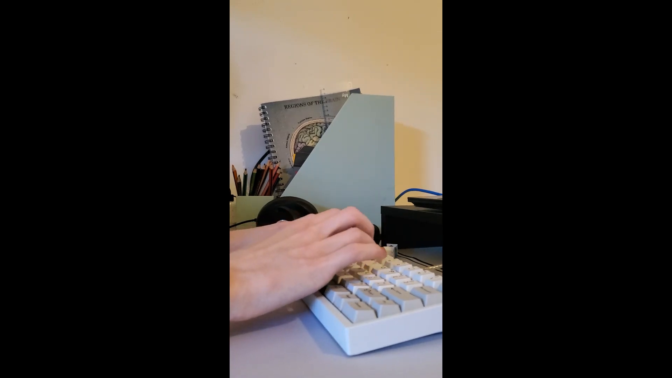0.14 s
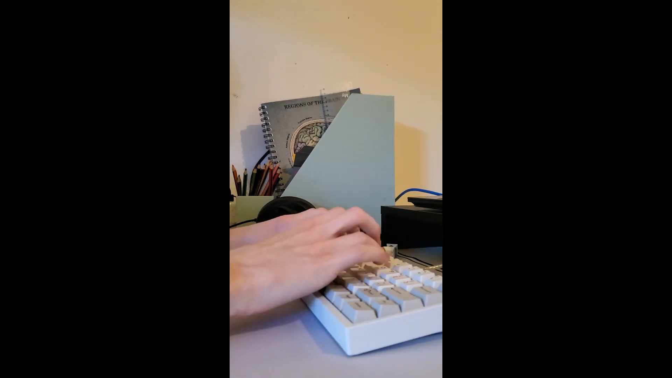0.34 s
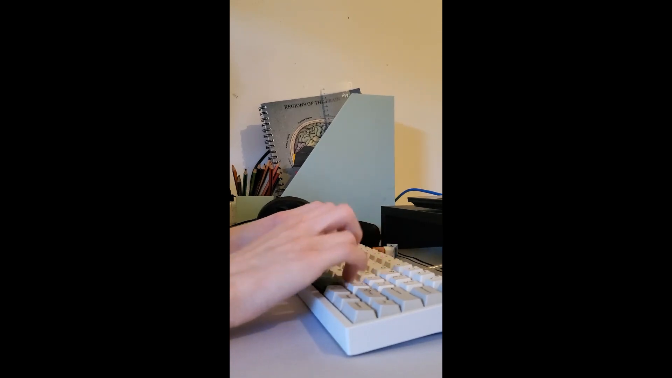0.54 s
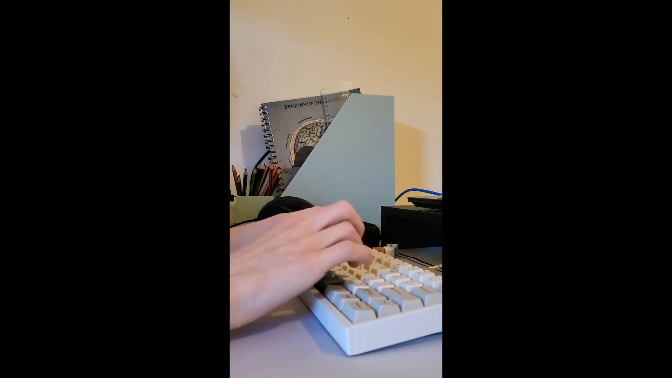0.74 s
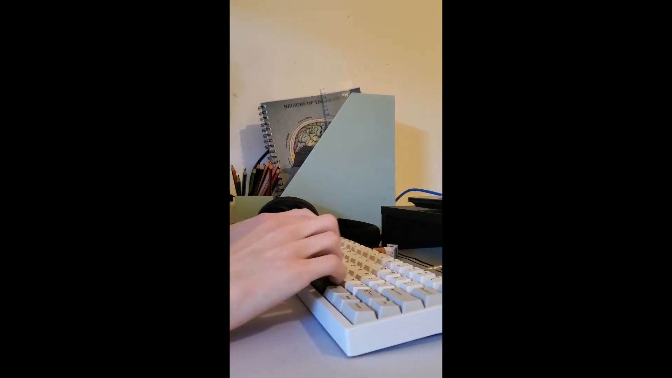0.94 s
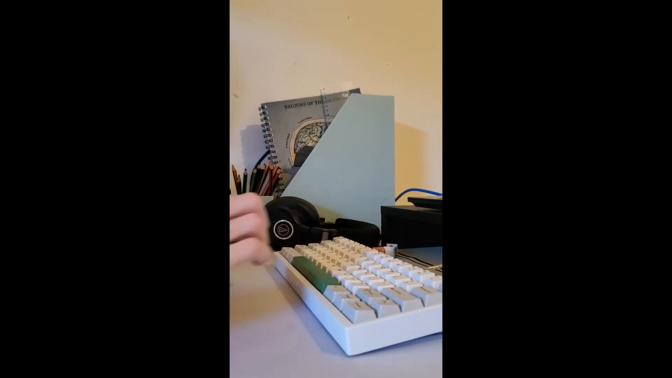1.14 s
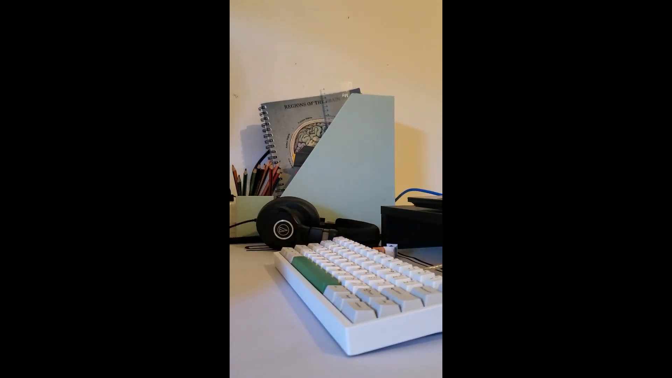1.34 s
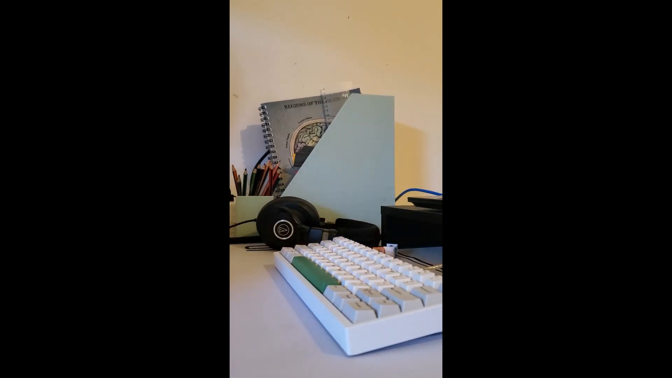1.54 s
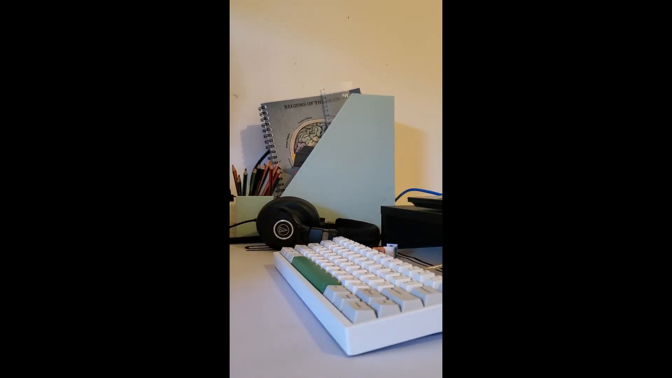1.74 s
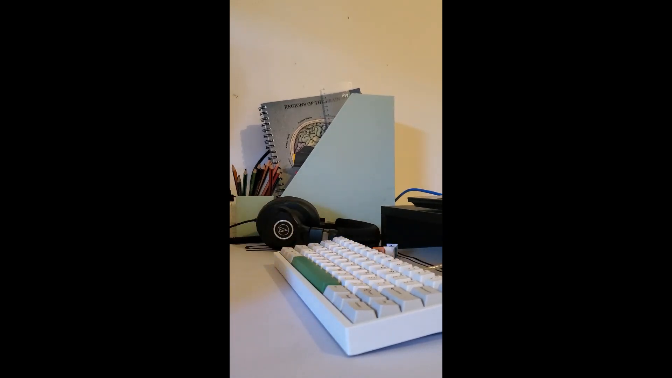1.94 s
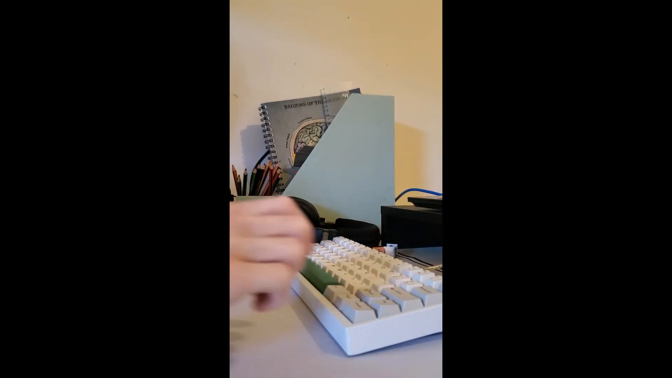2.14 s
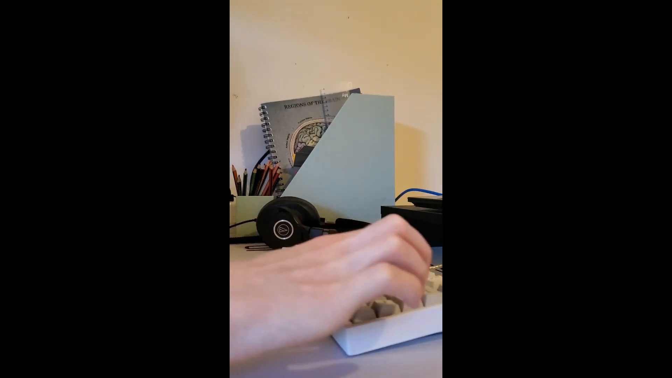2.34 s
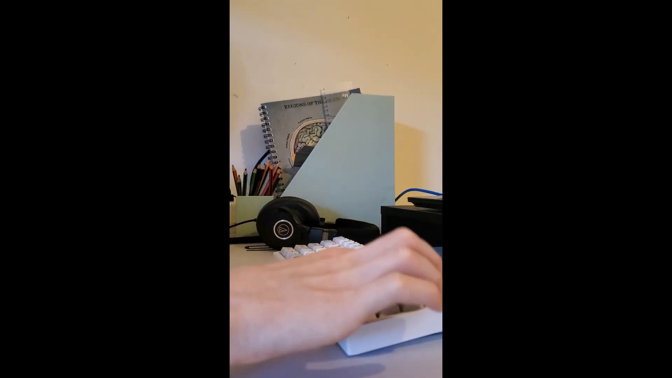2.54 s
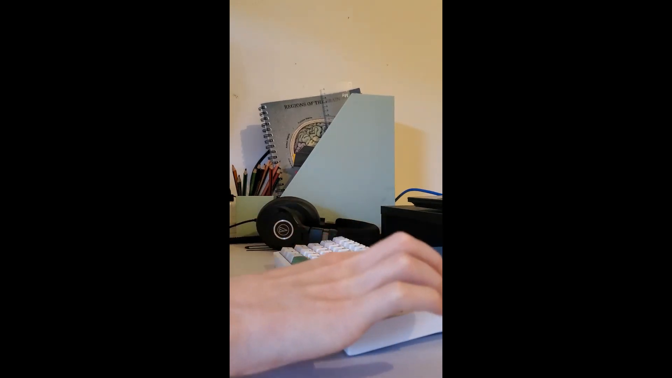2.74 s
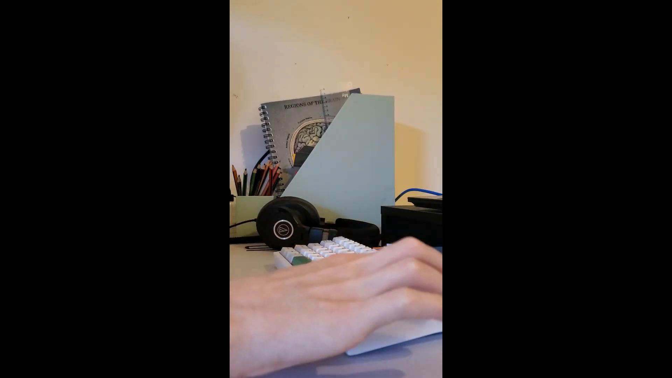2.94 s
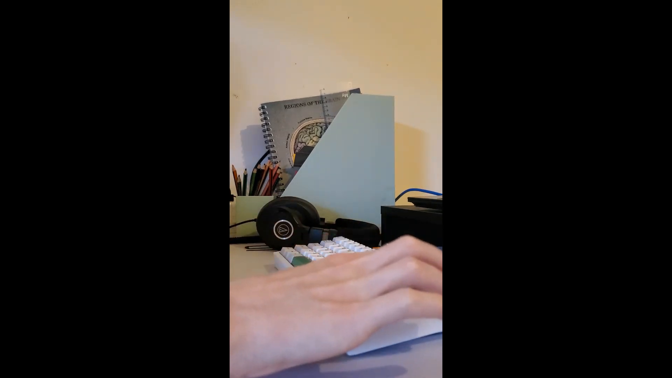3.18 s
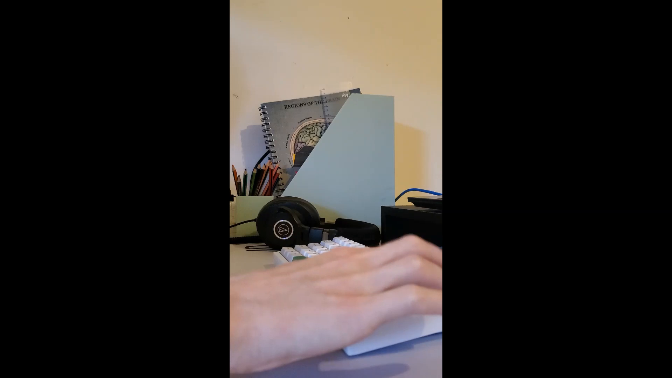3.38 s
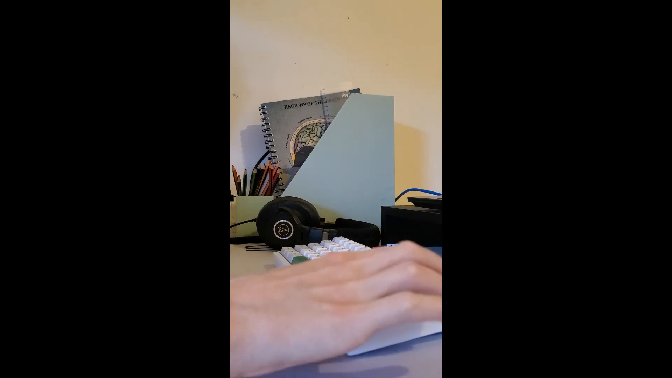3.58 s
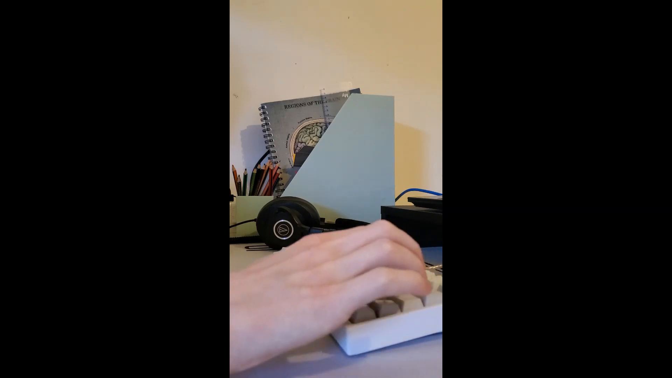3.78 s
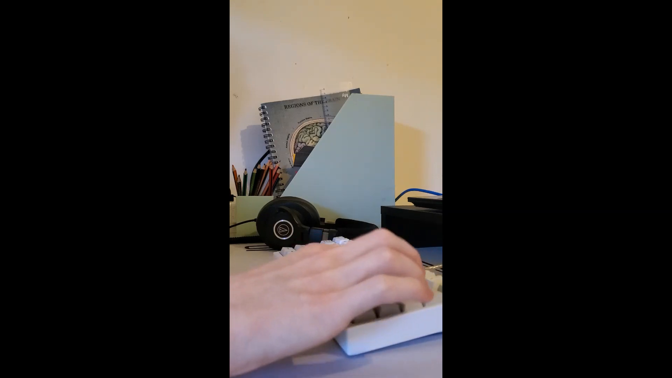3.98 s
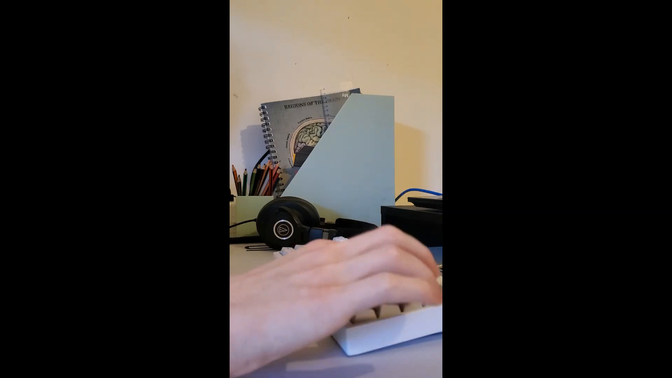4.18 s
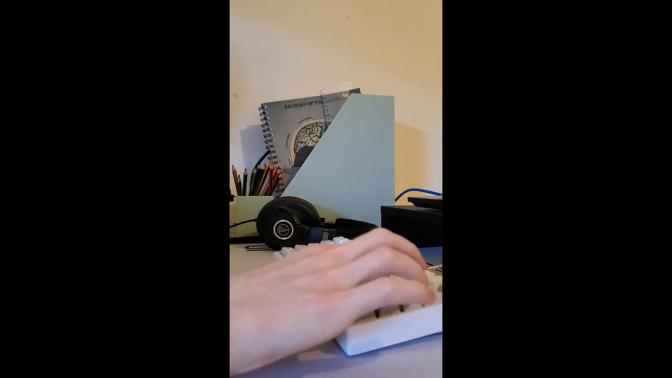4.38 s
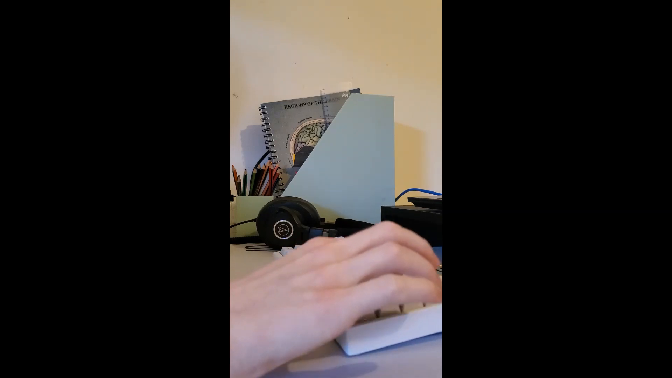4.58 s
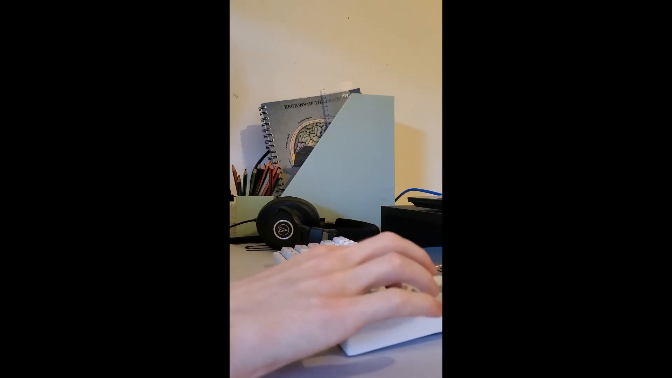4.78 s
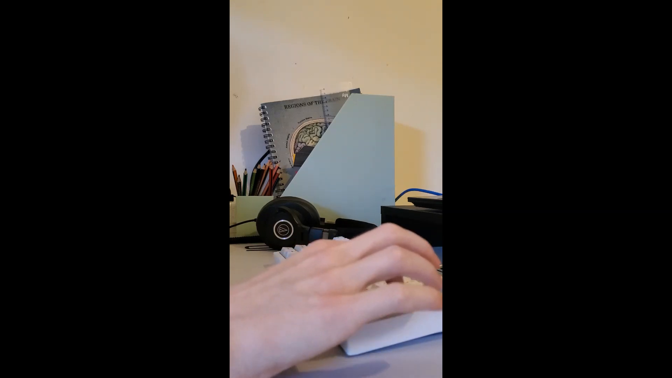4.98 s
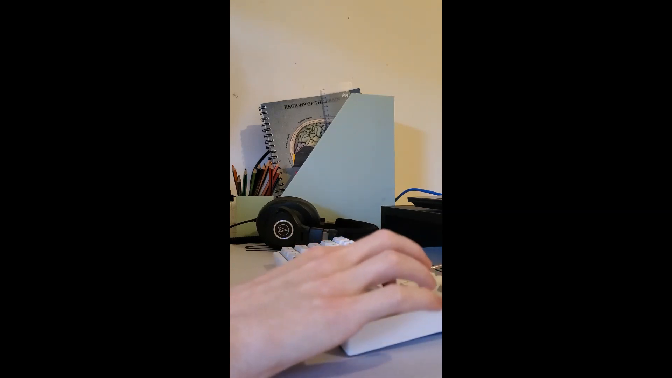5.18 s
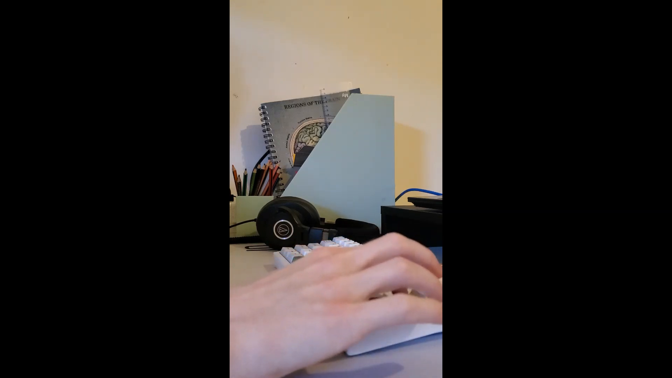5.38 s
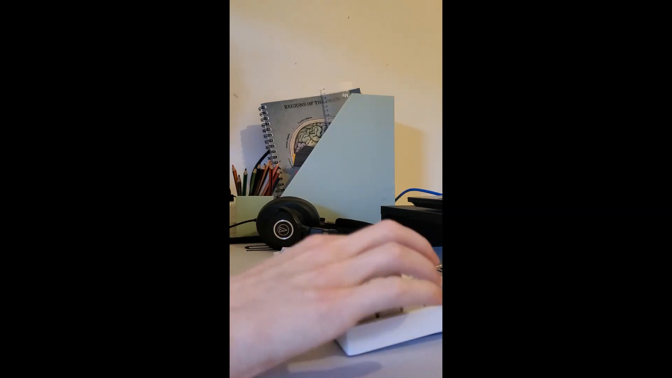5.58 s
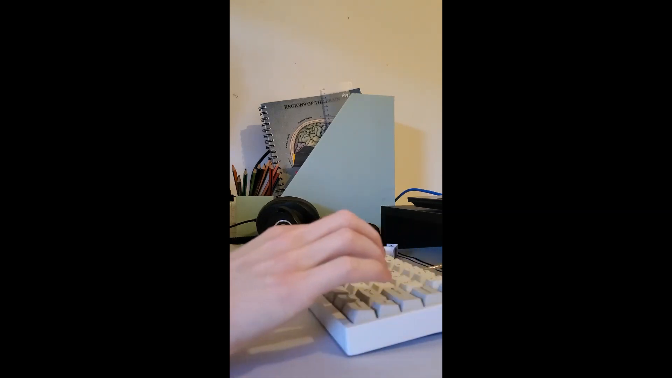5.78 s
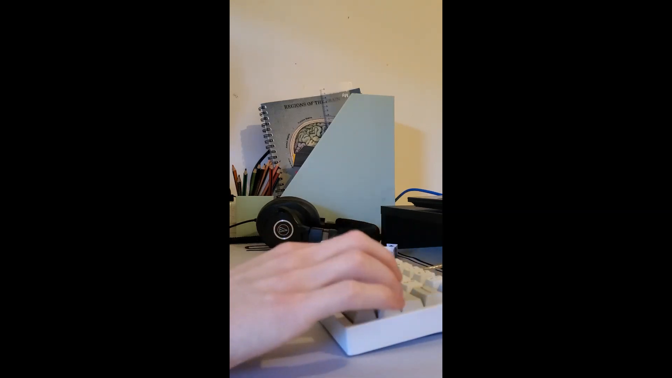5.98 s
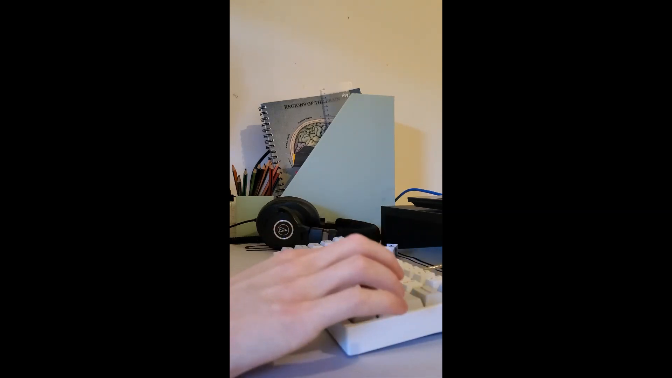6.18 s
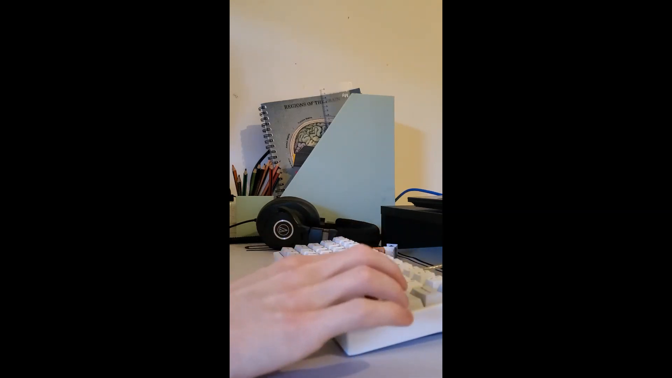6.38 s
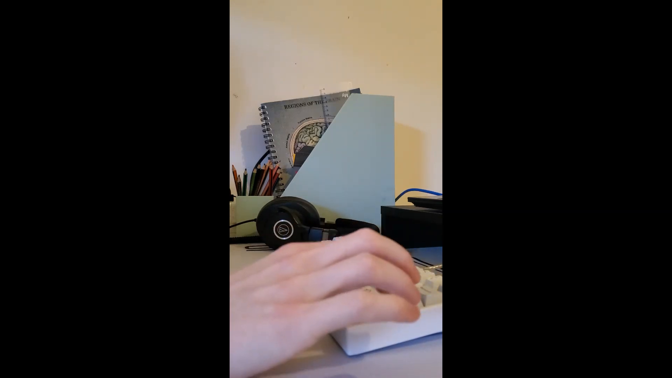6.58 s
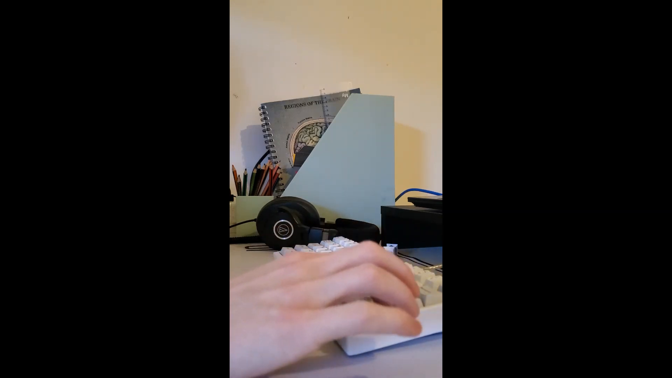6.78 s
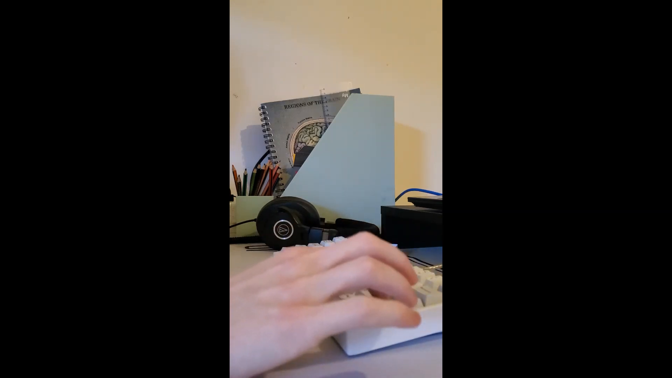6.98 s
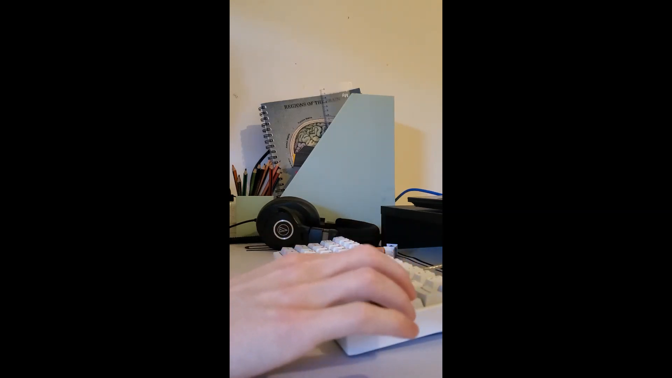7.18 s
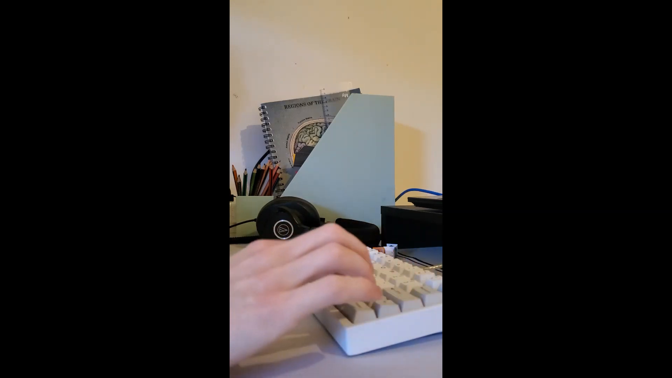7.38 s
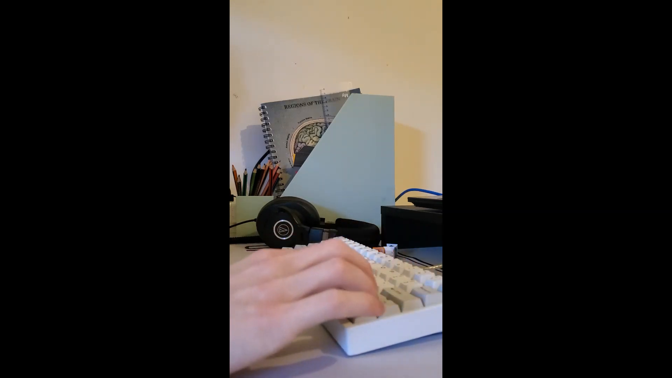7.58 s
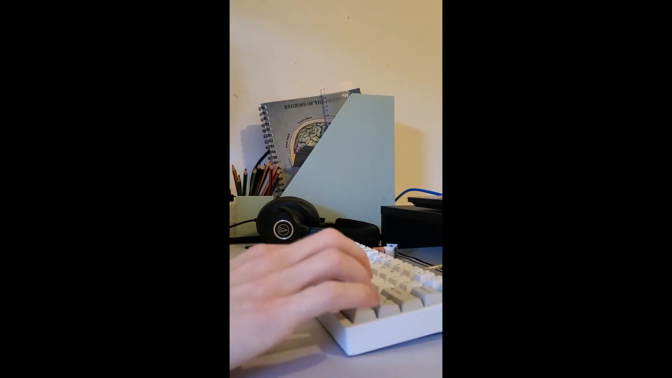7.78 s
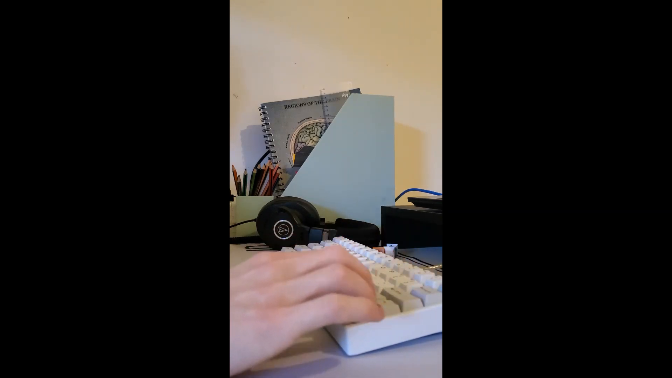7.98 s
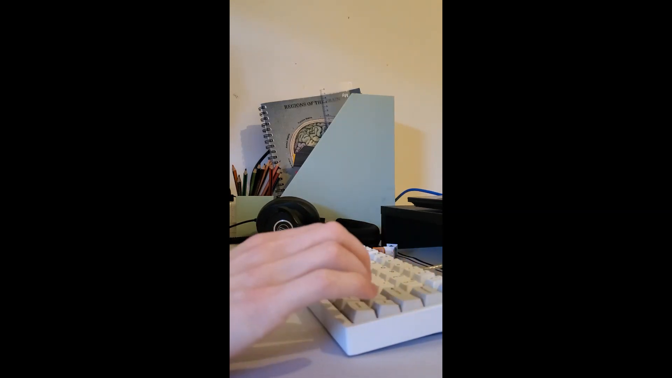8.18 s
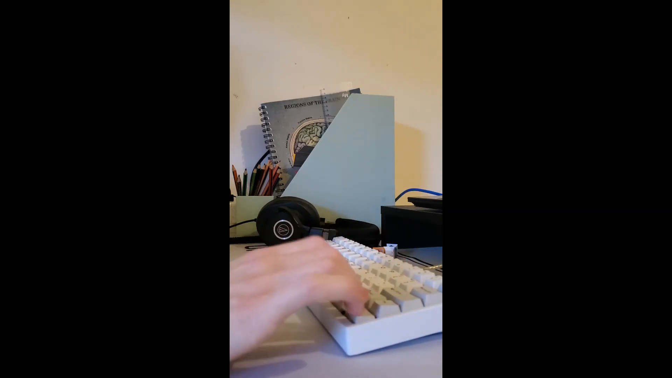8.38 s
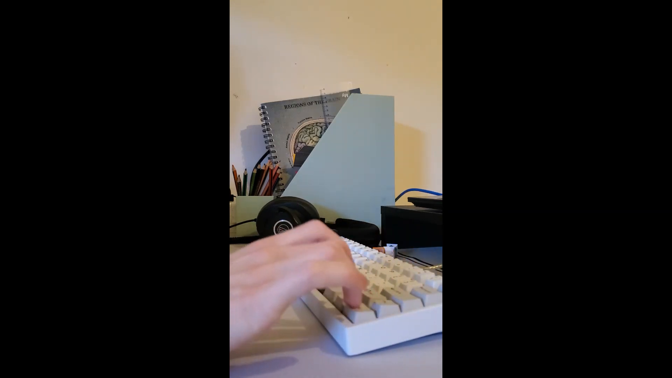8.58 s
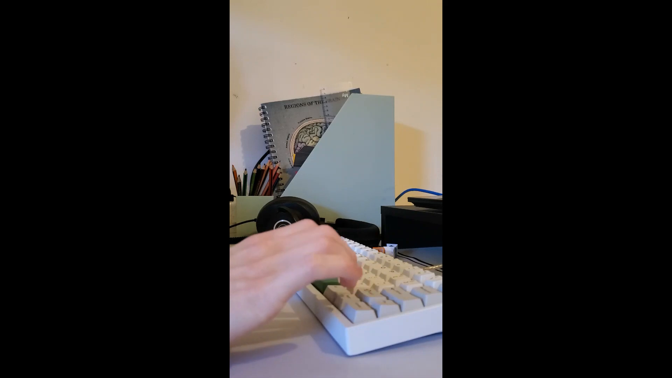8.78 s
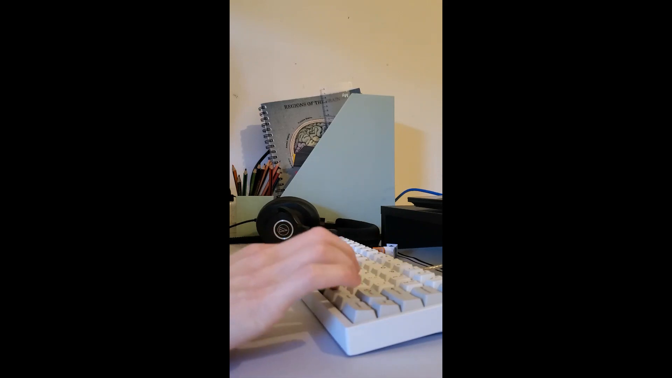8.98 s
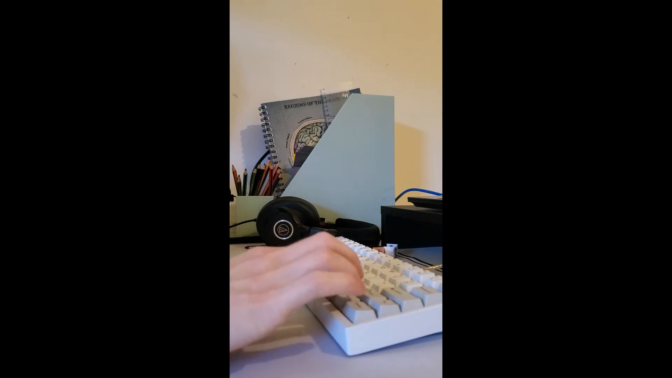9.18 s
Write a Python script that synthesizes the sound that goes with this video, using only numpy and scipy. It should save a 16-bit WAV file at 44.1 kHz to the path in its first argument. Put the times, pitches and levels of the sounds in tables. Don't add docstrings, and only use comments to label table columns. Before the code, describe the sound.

Close, dry plastic typing on a desk. Caps chatter rapidly under brushing fingers, thin out and stop; a faint scuff follows in the lull. Then regular presses at about eight a second, with short gaps, each press followed by a lighter spring-back tick. Early taps are scratchy, middle ones clickier, later ones fuller. The right channel is close, the left duller and roomier, with low hum and soft hiss beneath.

```python
import sys
import numpy as np
from scipy import signal
from scipy.fft import rfft, irfft
from scipy.io import wavfile

SR = 44100
rng = np.random.default_rng(int(sys.argv[2]) if len(sys.argv) > 2 else 0)


def boost_factor(decibels):
    exponent = np.asarray(decibels, float) / 20
    return 10 ** exponent


def inscribe(sig):
    pcm = np.round(np.clip(np.atleast_2d(sig).T, -1, 1) * 32767)
    wavfile.write(sys.argv[1], SR, pcm.astype(np.int16))


N = 407043

# (low f/Hz, high f/Hz, level/dB, 60 dB decay t/s)
CONTACT_BANDS = [(1090, 3840, -1.5, 0.02), (3740, 6640, -0.5, 0.0095), (8000, 12570, -0.5, 0.008),
                 (12000, 15500, -1.5, 0.0096)]
HIT_LAG_S = 0.001192
ROLL_END_S = 1


def band(x, low_hz, high_hz):
    high_hz = min(high_hz, 0.45 * SR)
    return signal.sosfilt(signal.butter(2, [low_hz, high_hz], "band", fs=SR, output="sos"), x + 1e-18)


def rms_one(x):
    return x / np.sqrt(np.mean(x ** 2) + 1e-30)


def fade(db, t60):
    return boost_factor(-db / (t60 * SR))


def drift(rate):
    knots = rng.standard_normal(1200)
    return np.interp(np.arange(N) / SR * rate, np.arange(len(knots)), knots) * 1.2


def train(seconds, sizes):
    out = np.zeros(N)
    np.add.at(out, np.clip(np.round(seconds * SR).astype(int), 0, N - 1), sizes)
    return out


def ring(clicks, hz, t60):
    r, w = fade(60, t60), 2 * np.pi * hz / SR
    return signal.lfilter([0, np.sin(w)], [1, -2 * r * np.cos(w), r * r], clicks + 1e-18)


def colour(x, peaks):
    for hz, width, db in peaks:
        a, w = boost_factor(db / 2), 2 * np.pi * hz / SR
        k = np.sin(w) * width / hz / 2
        middle = -2 * np.cos(w)
        x = signal.lfilter([1 + k * a, middle, 1 - k * a], [1 + k / a, middle, 1 - k / a], x)
    return x


def tail(x, low_hz, high_hz, t60):
    r = fade(120, t60)
    smooth = signal.lfilter([0.008], [1, -0.992], x ** 2)
    power = signal.lfilter([1 - r], [1, -r], smooth)
    return np.sqrt(power) * rms_one(band(rng.standard_normal((2, N)), low_hz, high_hz))


def hiss(level_db=-67):
    # (f/Hz, level/dB per Hz)
    floor = np.array([(35, -1.5), (62, -1.5), (115, -9.5), (160, -9.5), (250, -11.5), (400, -15.5),
                      (700, -26), (1500, -30), (3000, -33), (5500, -38.5), (7800, -48), (10000, -39.5),
                      (13000, -34.5), (15850, -35.5), (16050, -57)])
    hz = np.fft.rfftfreq(N, 1 / SR) + 1
    shape = boost_factor(np.interp(np.log(hz), np.log(floor[:, 0]), floor[:, 1]))
    return boost_factor(level_db) * rms_one(irfft(rfft(rng.standard_normal((2, N))) * shape, N))


def hum():
    # (f/Hz, rms level/dB, left re right level/dB)
    lines = [(49, -50, -10), (89.3, -68, -10), (138.9, -66, -16.5), (189, -79, -11), (308, -68.5, -32.5),
             (346, -78.5, -32.5)]
    t, out = np.arange(N) / SR, np.zeros((2, N))
    for hz, db, left_db in lines:
        level = np.sqrt(2) * boost_factor(db + 1.5 * drift(8))
        tone = level * np.sin(2 * np.pi * hz * t + 0.8 * drift(4))
        out += tone * boost_factor(np.array([[left_db], [0]]))
    return out


def room(x, parts=2):
    # (low f/Hz, high f/Hz, 60 dB decay t/s, right level/dB, left level/dB)
    answers = [(624, 1200, 0.33, -8.5, -11), (1173, 1700, 0.28, -6.5, -2.5), (1630, 2780, 0.22, -9.5, -5.5),
               (2210, 3280, 0.22, -6, -2.5), (3140, 4370, 0.29, -8, -4), (4240, 6010, 0.21, -7.5, -4.5),
               (7500, 10930, 0.21, -8, 0.5), (12200, 14000, 0.38, -10.5, -2.5)]
    out = 0
    for low, high, t60, right_db, left_db in answers:
        edges = np.geomspace(low, high, parts + 1 if 1000 < low < 4000 else 2)
        for a, b in zip(edges, edges[1:]):
            out = out + boost_factor(np.array([[left_db], [right_db]])) * tail(band(x, a, b), a, b, t60)
    return out


def echoes(x):
    # (lag t/s, right level/dB, left level/dB, dull above f/Hz)
    copies = [(.0032, -22.5, -12, 5000), (.0056, -11.5, -13, 3500), (.0092, -15.5, -13.5, 15000),
              (.0101, -17.5, -14, 9000), (.021, -33, -26, 8000), (.0272, -22, -20.5, 3500),
              (0.0324, -23.5, -18, 6500), (.0425, -30.5, -20, 4000)]
    out = np.zeros((2, N))
    for lag, right_db, left_db, hz in copies:
        dull = signal.sosfilt(signal.butter(2, hz, fs=SR, output="sos"), x)
        out += np.roll(dull, round(lag * SR)) * boost_factor(np.array([[left_db], [right_db]]))
    return out


def knocks():
    # (t/s, level/dB, f/Hz, 60 dB decay t/s, left re right level/dB)
    blows = [(0.131, -55, 960, 0.06, -24), (1.0401, -66, 1600, .03, -12), (1.0412, -66, 1040, .04, -12),
             (1.071, -65, 1620, .05, -12), (1.0725, -64, 2100, .04, -12), (1.074, -61, 1020, 0.05, -12),
             (1.082, -68, 1650, .05, -12), (1.097, -64, 1010, .05, -12), (1.0981, -40, 90, 0.13, -23),
             (1.116, -68, 1050, .1, -12), (1.6041, -54, 2400, 0.13, -17), (1.9591, -79, 1780, .15, -14),
             (6.0258, -45.5, 210, 0.011, 14), (6.0271, -34.5, 78.6, .045, 7)]
    out = np.zeros((2, N))
    for s, db, hz, t60, left_db in blows:
        blow = ring(train(np.array([s]), boost_factor(db)), hz, t60)
        out += band(blow, hz / 2, hz * 2) * boost_factor(np.array([[left_db], [0]]))
    return out


def rubbing(gains, grain_db):
    clumps = boost_factor(grain_db * drift(110)) * boost_factor(2.0 * rng.exponential(1, N))
    slips = rng.standard_normal(N) * clumps
    return sum(g * rms_one(band(slips, low, high)) for g, (low, high, _, _) in zip(gains, CONTACT_BANDS))


def brushing(rise_db_per_s=1600, fall_db_per_s=191):
    # (t/s, held t/s, dull level/dB, middle re dull level/dB, bright re dull level/dB)
    strokes = [
        (0, .52, -66.5, -22, -5.5),
        (0.621, .04, -92, -12, -5),
        (1.599, 0.021, -60, 5, 2),
        (1.8, 0.017, -81, 8.5, 6),
        (1.97, 0.11, -86.5, 11, 13),
        (2.19, 0.055, -88.5, 4.5, 4),
    ]
    gains, t = np.zeros((4, N)), np.arange(N) / SR
    for s, held, db, mid_db, bright_db in strokes:
        shape_db = np.minimum(0, np.minimum(rise_db_per_s * (t - s), fall_db_per_s * (s + held - t)))
        gains += boost_factor(db + shape_db) * boost_factor(np.array([[0], [mid_db], [bright_db], [bright_db]]))
    return colour(rubbing(boost_factor(1.0) * gains, grain_db=0.5), [(2400, 1300, 11.0)])


def sliding():
    # (t/s, level/dB)
    scratch = [
        (2.45, -97),
        (2.709, -62),
        (4.05, -90),
        (4.13, -64),
        (5.58, -90.5),
        (9.23, -99),
    ]
    level = boost_factor(np.interp(np.arange(N) / SR, *np.transpose(scratch), left=-200))
    return rubbing(boost_factor(np.array([[-2.5], [-3], [-6], [-7]])) * level, grain_db=4.5)


def contacts(roll_cap_db=1.5, roll_air_db=-30, touch_cap_db=-2, touch_stem_db=-13):
    # (t/s, peak level/dB, case f/Hz, stem tick re peak
    # level/dB, desk thump level/dB)
    fast_roll = [(0.0041, -40.5, 2820, -20, -53), (0.0403, -40, 3960, -11, -60),
                 (0.049, -31, 3510, -19, -55), (0.0569, -33, 3000, -23, -59), (0.07, -50, 2450, -23, -55),
                 (0.0765, -54, 2990, -23, -48.5), (0.1274, -36, 1660, -4.5, -53),
                 (0.154, -33.5, 1720, -4.5, -53), (0.1691, -36, 1840, -17, -65),
                 (0.1961, -57, 1890, -25, -67), (0.2201, -41, 2560, -17, -52),
                 (0.2352, -30, 2340, -11, -60), (0.2425, -42, 2080, -7, -51), (0.262, -47, 2320, -6, -56),
                 (0.266, -52, 2280, -20, -50), (0.2792, -52, 2500, -9, -53), (0.2865, -40, 4200, -3, -59),
                 (0.2931, -32.5, 1760, -23, -54), (0.3007, -30, 3220, -9.5, -49.5),
                 (0.3087, -37, 3170, -13, -59), (0.3191, -26.5, 2540, -21, -53),
                 (0.3271, -32, 2720, -9, -66), (0.337, -46, 2840, -21, -60),
                 (0.346, -46, 2730, -20, -61), (0.3562, -53, 2880, -20, -46.5),
                (0.3738, -46, 2520, -19, -53), (0.3815, -31.5, 1800, -19, -48),
                (0.4019, -37, 2930, -1, -57), (0.4102, -48, 3270, -14, -50), (0.4239, -28, 2570, -18, -47),
                (0.4312, -34, 2280, -16, -65), (0.4491, -48, 2470, -19, -53.5),
                (0.4705, -42, 2300, -4, -55), (0.4776, -46, 2680, -6, -48), (0.4837, -31.5, 1710, -29, -52),
                (0.492, -32.5, 3120, -16, -51), (0.502, -42, 2500, -23, -56), (0.512, -48, 2370, -25, -75),
                (0.519, -37.5, 3340, -6.5, -56), (0.5281, -42, 2240, -12, -49.5),
                (0.5406, -48, 2260, -14, -52.5), (0.5565, -46, 2220, -2, -53.5),
                (0.6347, -39.5, 3630, -4.5, -57), (0.6509, -32, 1930, -7, -51.5),
                (0.763, -44, 2000, -3.5, -57.5)]
    # (t/s, peak level/dB, case f/Hz, desk thump
    # level/dB)
    touches = [(1.0391, -59, 1750, -59), (0.98, -62, 1490, -66), (1.598, -53, 2400, -82),
               (1.608, -49, 2400, -75), (1.6175, -50, 2500, -81), (1.635, -45, 2310, -75),
               (2.624, -43.5, 1778, -80), (3.461, -53, 2000, -52), (3.9454, -41.5, 2050, -58),
               (4.287, -58, 2500, -60), (4.848, -55, 2500, -57), (5.029, -51, 2240, -53),
               (5.2172, -41.5, 2050, -57), (5.9472, -46.5, 1750, -56.5), (6.337, -47, 2010, -55),
               (6.707, -69, 1225, -54), (7.1224, -57, 1996, -61), (4.9, -61, 2000, -53),
               (7.5047, -53, 2930, -60.5), (7.7233, -53, 2500, -56), (8.0436, -51, 2098, -73),
               (8.4135, -50.5, 2000, -60), (8.977, -50, 2940, -54.5)]
    # (t/s, peak level/dB, case f/Hz, desk thump level/dB, cap click
    # re peak level/dB)
    presses = [(2.5002, -28, 2090, -41.5, -1.5), (2.6399, -30.5, 1750, -41.5, -1.5),
               (2.7713, -32, 2000, -40, 1), (2.9004, -32.5, 2100, -44, -3),
               (3.0229, -36.5, 2050, -48.5, -7), (3.1349, -36, 2070, -46, -8),
               (3.2518, -34.5, 2090, -45.5, -9), (3.3678, -33, 2030, -43, -14),
               (3.4847, -29.5, 1840, -38, -4.5), (3.6133, -27, 2140, -41, -6),
               (3.9538, -33.5, 1970, -39, -3), (4.0918, -36, 2180, -43, 8), (4.2279, -34, 1460, -40.5, 9),
               (4.3709, -38, 2240, -42.5, 5.5), (4.4776, -43, 2230, -46, 2), (4.6072, -41, 2350, -40, 14.5),
               (4.7256, -36, 1450, -38.5, 8.5), (4.8561, -41, 3040, -44, 13),
               (4.9775, -53, 2340, -47.5, 14), (5.0951, -37, 1500, -42, 5.5),
               (5.2241, -38.5, 2210, -41.5, 0), (5.3645, -46, 3100, -43, 13),
               (5.4615, -47.5, 2480, -39.5, 14.5), (5.5757, -35, 2160, -39, 4.5),
               (5.9575, -34, 1730, -45, -3.5), (6.093, -29, 1720, -42.5, -8.5),
                    (6.2257, -31.5, 1730, -45.5, -5), (6.3458, -30.5, 1870, -45.5, -6),
                    (6.461, -28, 1800, -44, -10.5), (6.7399, -46, 1720, -58, -10),
                    (6.8696, -35.5, 1830, -43.5, -4), (7.003, -35.5, 2090, -47, -9),
                    (7.1296, -34, 2130, -43.5, -16), (7.2463, -31, 1860, -44.5, -4.5),
                    (7.5179, -36.5, 1780, -47.5, 6), (7.6558, -31.5, 2620, -45.5, -5),
                    (7.7888, -33, 2450, -46, -1.5), (7.9227, -33, 1770, -46, -0.5),
                    (8.0529, -31, 1660, -42.5, -3.5), (8.4224, -34, 1650, -44, 4),
                    (8.5566, -30.5, 1720, -43.5, -1), (8.6905, -25.5, 1770, -44, 0.5),
                    (8.9939, -43.5, 1930, -56, -6.5), (9.1381, -35.5, 1830, -54, -1)]
    # (t/s, peak level/dB, case f/Hz, desk thump level/dB, cap click re peak
    # level/dB)
    releases = [(2.5717, -39, 1260, -47.5, 6), (2.7074, -38, 1740, -48, 0.5), (2.8361, -39, 1770, -54, 0.5),
                (2.9556, -43.5, 1840, -57, 2.5), (3.0873, -53, 1900, -60, -9), (3.195, -43, 2060, -50, -1),
                (3.3077, -43.5, 1800, -50, -0.5), (3.4289, -44.5, 3060, -49, 2),
                (3.5513, -42, 2150, -54.5, 2.5), (3.6891, -41, 1680, -60, 7),
                (4.031, -37.5, 1790, -46.5, -9), (4.162, -34, 1570, -42, -1),
                (4.3001, -35.5, 2190, -43, 2.5), (4.4216, -59, 3010, -53, 0), (4.5424, -38, 2150, -49, -5),
                (4.6683, -37, 1820, -51, 1), (4.8073, -48, 3000, -51.5, -6), (4.9174, -62, 2320, -62, 9),
                (5.0378, -36, 2320, -46, -2), (5.1737, -42, 2110, -47, -2), (5.292, -34, 2100, -46, -3),
                (5.414, -57, 2590, -52, -1), (5.5179, -39, 2230, -43, -4), (5.6574, -33.5, 1690, -44.5, 1),
                (6.0318, -43.5, 1100, -49.5, 2.5), (6.1591, -41, 3120, -50.5, 4.5),
                     (6.2847, -40, 2200, -43.5, 5.5), (6.4009, -38.5, 2660, -53, 2),
                     (6.5408, -44.5, 1140, -53, 3.5), (6.8091, -43, 1740, -50, -2),
                     (6.9354, -38.5, 1620, -57, -10), (7.0719, -39.5, 1680, -52.5, -6.5),
                     (7.1875, -36, 1670, -43.5, -1.5), (7.3315, -39.5, 1705, -55, -2),
                     (7.5975, -40.5, 1600, -51, -3), (7.7342, -45.5, 1400, -64, 7),
                     (7.862, -41.5, 1700, -68, 2.5), (7.982, -37.5, 1600, -50, 6.5),
                     (8.142, -42, 1650, -55.5, -2), (8.5113, -44, 1900, -55, 8),
                     (8.6385, -36.5, 1260, -51.5, 0), (8.7885, -42.5, 1340, -64, 1),
                     (9.0683, -45, 1830, -73, 3), (9.2006, -44, 1820, -58, 4.5)]
    key_from_s = [2.4, 2.99, 3.46, 3.9, 4.35, 4.58, 4.83, 5.07, 5.2, 5.34, 5.55, 5.9, 6.6, 7.4, 7.62, 8.0,
                  8.3, 8.9]
    # (tick going down re peak level/dB, tick coming up re peak level/dB, air re tick level/dB)
    key_sounds = [(-13.5, -12.5, 4.5), (-20, -16, 8), (-22, -0.5, 1.5), (0, -8, 5), (0, -12.5, -5),
                  (8.5, -2, 1), (1.5, -12, 3.5), (5.5, -16, 4.5), (-6.5, -19, 4), (-2.5, -10, 2),
                  (3.5, -13, -3), (-23.5, -19, 11), (1.5, -6.5, -24), (-7.5, -17, 9.5), (-1, 3.5, -4.5),
                  (-0.5, -15, -4), (-18, -19, 9.5), (-24, -12, 5.5)]
    rows = []
    for s, db, hz, tick, thump in fast_roll:
        rows.append((s, db, hz, tick + roll_cap_db, tick, thump, roll_air_db))
    for s, db, hz, thump in touches:
        rows.append((s, db, hz, touch_cap_db, touch_stem_db, thump, 0))
    for way, table in enumerate((presses, releases)):
        for s, db, hz, thump, cap in table:
            key = key_sounds[np.searchsorted(key_from_s, s) - 1]
            rows.append((s, db, hz, cap, key[way], thump, key[-1]))
    return np.transpose(rows)


def desk(thump_db=-39.0, spread_db=1.5):
    # (f/Hz, level/dB, 60 dB decay t/s, left re right level/dB)
    tones = [(51.5, 6.5, 0.17, -11.5), (74.6, -7, 0.42, -18), (92.1, -3, 0.34, -31.5),
             (97, -1, 0.25, -29.5), (112, -11, 0.081, -18), (160.6, -1.5, 0.11, -17.5),
             (197.6, -7.5, 0.16, -34.5), (266, -1.5, 0.091, -36)]
    s, level_db = contacts()[[0, 5]]
    chance, out = rng.standard_normal((len(s), len(tones))), np.zeros((2, N))
    for (hz, db, t60, left_db), own in zip(tones, chance.T):
        thumps = train(s + 0.00753, boost_factor(level_db + thump_db + db + spread_db * own))
        bounce = ring(thumps, 99.3, 0.055)
        mode = ring(bounce, hz, t60)
        out += np.array([boost_factor(left_db) * np.roll(mode, 45), mode])
    landing = train(s + 0.02193, boost_factor(level_db - 6))
    out[1] += band(ring(landing, 204.4, 0.091), 166, 240)
    out = band(band(out, 53, 640), 35, 1000)
    return out + boost_factor(np.array([[-47.0], [-38.0]])) * tail(out[1], 390, 562, 0.076)


def case(ring_db=-13, reach_octaves=0.48, rattle_db=-23, rattle_t60=0.17, per_s=200, rattle_hz=2300, far_db=-16):
    # (f/Hz, level/dB, 60 dB decay t/s)
    tones = [(1000, 2, 0.15), (1194, 6.5, 0.045), (1420, -0.5, 0.034), (1523, -2.5, 0.035),
             (1821, 2, 0.021), (1894, -7, 0.027), (2120, 3.5, 0.017), (2332, -2, 0.042), (2450, -25, 0.013),
             (2617, 1, 0.041), (2930, -10, 0.037), (3050, -2.5, 0.078), (3714, -4.5, 0.019),
             (4210, 8, 0.016)]
    s, peak_db, key_hz = contacts()[:3]
    chance, out = rng.standard_normal((len(s), len(tones))), np.zeros(N)
    for (hz, db, t60), own in zip(tones, chance.T):
        level_db = peak_db + db + 2.2 * own
        near_db = np.maximum(far_db, -6 * (np.log2(hz / key_hz) / reach_octaves) ** 2)
        loose_hz = np.sqrt(key_hz * rattle_hz)
        loose_db = -6 * (np.log2(hz / loose_hz) / 0.32) ** 2
        blows = train(s + HIT_LAG_S, boost_factor(level_db + ring_db + near_db))
        shaken = train(s + 0.016, boost_factor(level_db + rattle_db + loose_db))
        unrest = signal.lfilter([1], [1, -fade(60, rattle_t60)], shaken + 1e-18)
        rattles = (rng.random(N) < per_s / SR) * rng.standard_normal(N)
        out += ring(blows + unrest * rattles, hz, t60)
    return out


def clacks(level_db=3.5, t60=0.012, rise_s=0.00015, roll_rise_s=0.0005):
    out, t = np.zeros(N + 1024), np.arange(1024) / SR
    for s, peak_db, key_hz, *_ in contacts().T:
        at = round((s + HIT_LAG_S) * SR)
        rise = 1 - np.exp(-t / (roll_rise_s if s < ROLL_END_S else rise_s))
        level = boost_factor(peak_db + level_db - 60 * t / t60)
        out[at:at + len(t)] += rise * level * np.sin(2 * np.pi * key_hz * t)
    return out[:N]


def cracks(scrape_db=-26, roll_grit_db=-7):
    s, peak_db, _, cap_db, stem_db, _, air_db = contacts()
    out = np.zeros(N)
    grit_db = np.where(s < ROLL_END_S, roll_grit_db, 0)
    band_levels = (grit_db, cap_db, stem_db, stem_db + air_db)
    for (low, high, db, t60), rel_db in zip(CONTACT_BANDS, band_levels):
        hits = train(s + HIT_LAG_S, boost_factor(peak_db + rel_db + db))
        scrape = boost_factor(scrape_db) * signal.lfilter([1], [1, -0.994], hits[::-1])[::-1]
        soft_hits = signal.lfilter([0.15], [1, -0.85], hits)
        crack = signal.lfilter([1], [1, -fade(60, t60)], soft_hits)
        grit = rng.standard_normal(N) * np.sqrt(SR / 2 / (high - low))
        out += band((crack + scrape) * grit, low, high)
    return out


def scene():
    # (f/Hz, width/Hz, level/dB)
    right_port = [(7750, 460, 1), (8150, 8180, -12.5), (6354, 1970, 10.5), (11230, 4670, 10.5),
                  (15400, 1300, 7)]
    # (f/Hz, width/Hz, level/dB)
    left_port = [(7270, 2500, -0.5), (10530, 7900, 8.5), (13700, 9200, -17.5), (4920, 6800, -8.5)]
    brush = brushing()
    keys = cracks() + clacks() + case() + sliding()
    keys = band(band(keys, 1405, 28000), 440, 24000)
    left_room, right_room = np.roll(room(keys), round(0.011 * SR), axis=1) + echoes(keys)
    late = np.roll(boost_factor(-11.5) * keys + boost_factor(-10) * brush, 4)
    left = colour(late + boost_factor(-10.5) * left_room, left_port)
    right = colour(boost_factor(4.0) * (keys + brush + right_room), right_port)
    return np.array([left, right]) + boost_factor(8.0) * (desk() + knocks()) + hum() + hiss()


def low_pass(x):
    return signal.sosfilt(signal.butter(12, 17010, fs=SR, output="sos"), x)


def record(dry):
    cut = signal.sosfilt(signal.cheby2(10, 60, 17200, fs=SR, output="sos"), dry)
    return low_pass(cut)


dry = scene()
out = record(dry)
inscribe(out)
```